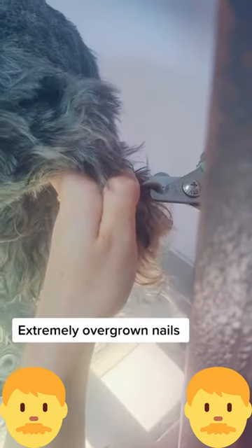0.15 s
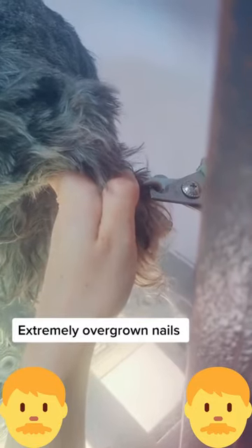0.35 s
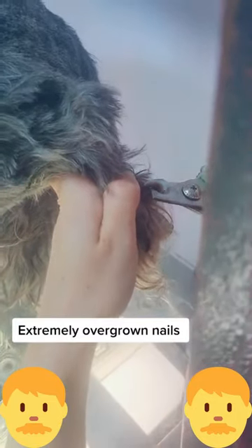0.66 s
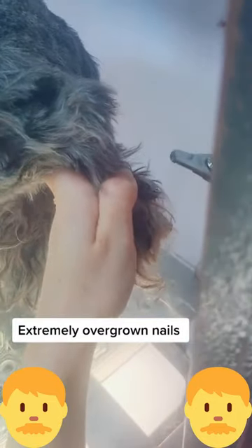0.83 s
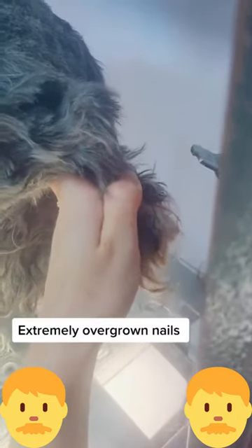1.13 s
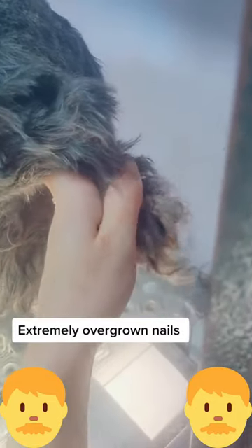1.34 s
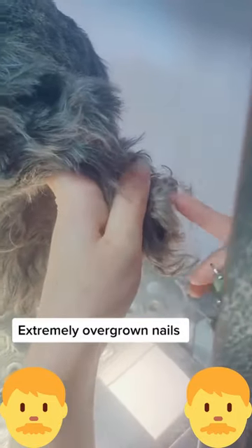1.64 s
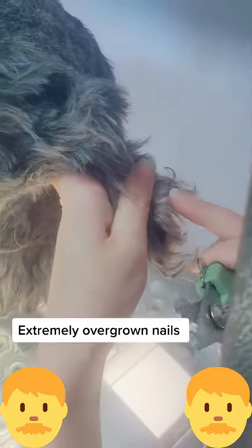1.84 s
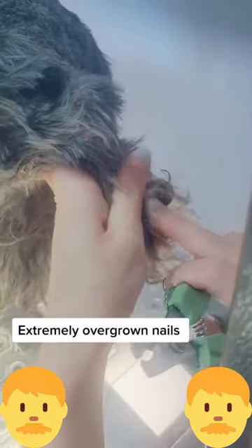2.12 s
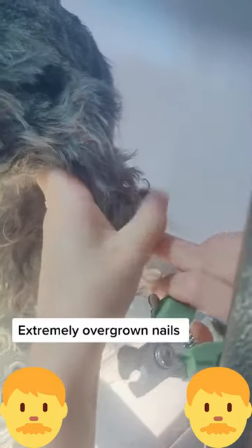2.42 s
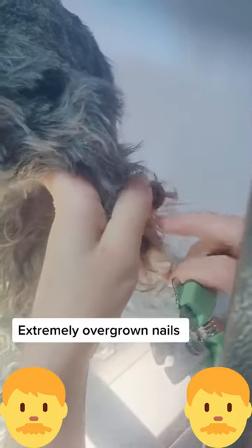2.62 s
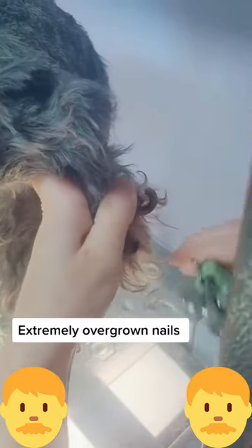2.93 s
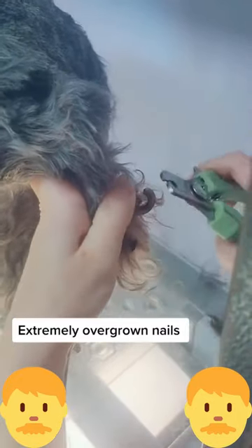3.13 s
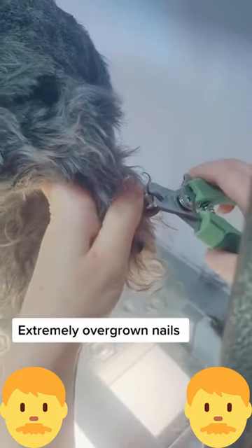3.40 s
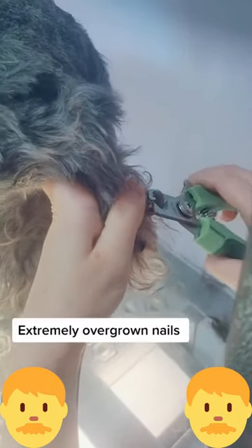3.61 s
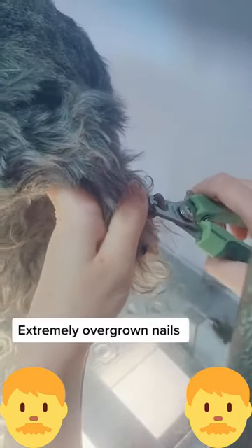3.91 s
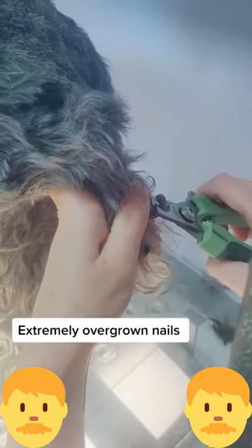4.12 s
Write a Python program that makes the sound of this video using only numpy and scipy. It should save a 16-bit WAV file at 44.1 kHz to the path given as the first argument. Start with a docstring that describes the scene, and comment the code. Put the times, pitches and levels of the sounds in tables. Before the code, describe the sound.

Low, steady air rumble with faint fan tones fills a small reverberant room. Before one second a dog's nail cracks sharply between metal clipper jaws. The tool then clicks and rattles lightly in the hand, strongest about a second later, while fingers brush fur. Muffled bumps come as the dog shifts; the rustle then settles into near quiet.

```python
"""Nail clippers at a dog's paw, close to the microphone in a small hard-walled room.
Faint strokes of friction hiss lead to the snap: a run of noise cracks, with decaying sines as the ringing jaws.
Then the tool clicks and scrapes in the hand (coloured noise bursts and hiss), and fingers brush the fur.
Dull bumps of muffled noise are the dog shifting its weight; the rustle of fur holds, then settles.
Ventilation lies under it all: shaped noise, duct resonances and wavering fan tones."""
import sys
import numpy as np
from scipy import signal
from scipy.fft import rfft, irfft, next_fast_len
from scipy.io import wavfile
from scipy.ndimage import uniform_filter1d

SR = 44100
rng = np.random.default_rng(int(sys.argv[2]) if len(sys.argv) > 2 else 0)


def wav_record(signal):
    """Record a signal, one row per channel, as 16-bit PCM in the file named by sys.argv[1]."""
    frames = np.transpose(np.atleast_2d(signal))
    bounded = np.clip(frames, -1, 1)
    # unit amplitude maps onto the largest positive 16-bit level
    quanta = np.round(bounded * 32767).astype(np.int16)
    wavfile.write(sys.argv[1], SR, quanta)


N = 187583

# The nail gives way in a quick run of cracks: (time [s], level [dB])
NAIL_CRACKS = [(0.8115, -36.5), (0.815, -28.5), (0.8162, -17), (0.8177, -13.5), (0.8186, -20.5),
               (0.8192, -18.5), (0.822, -26)]
# Spectrum of each crack: (frequency [Hz], relative level [dB])
CRACK_COLOUR = [(200, -46), (550, -38), (730, -10.5), (1000, -15.5), (1500, -9), (2200, -10.5), (3000, -5),
                (4400, -1), (6200, -7.5), (8000, 4), (10000, -9.5), (12500, -9), (14000, -9), (16000, -8.5)]
# Ringing of the released jaws: (frequency [Hz], relative level [dB], t60 [s])
JAW_MODES = [(790, -12, 0.024), (1989, -9.5, .03), (2640, -9.5, 0.056), (4160, -4.5, 0.028),
             (4860, -1.5, 0.034), (5970, -8.5, 0.046), (6620, -7, .04), (7400, -5, 0.047),
             (8320, 1.5, 0.025), (8950, -1, .025), (9570, -10.5, .035), (10030, -8.5, .03),
             (10500, -11, 0.017), (14200, -10, .02), (14800, -11.5, .025), (15300, -7, .02)]
# Spectrum of the snap as the walls return it: (frequency [Hz], relative level [dB])
SNAP_ECHO_COLOUR = [(200, -27), (700, -15), (1500, -13), (2000, -6), (2700, -1), (3700, -3), (5000, -3.5),
                    (6500, 0), (8000, -.5), (10000, -5), (11200, -10), (13800, -8), (16000, -14)]


def snap(ring_db=-22, crack_t60_s=0.0069, ring_rise_s=0.0014, echo_db=-33.5, ring_room_db=-19):
    """The nail cracks through, the released jaws ring in decaying modes, and the room answers."""
    cracks, jaws = np.zeros(N), np.zeros(N)
    for start_s, level_db in NAIL_CRACKS:
        add(cracks, start_s, amp(level_db) * burst(crack_t60_s, CRACK_COLOUR))

    release_s = NAIL_CRACKS[1][0]  # the second crack frees the jaws
    t = np.arange(SR // 4) / SR
    ring = np.zeros(len(t))
    for hz, level_db, t60_s in JAW_MODES:
        sine = np.sin(2 * np.pi * (hz * t + rng.random()))
        ring += amp(level_db) * decay(t, t60_s) * sine
    onset = 1 - np.exp(-t / ring_rise_s)
    add(jaws, release_s, amp(ring_db) * ring * onset)

    out = direct(cracks + jaws) + amp(ring_room_db) * room(jaws)
    add(out, release_s, amp(echo_db) * echo(SNAP_ECHO_COLOUR))
    return out


# Clicks of the jaws, spring and handles: (time [s], level [dB], t60 [s], thud [dB], body [dB], top [dB],
# echo level [dB], left minus right [dB])
TOOL_CLICKS = [(1.0898, -48.5, 0.035, -12, -9.5, 0, -70.5, 1),
               (1.5316, -34.5, 0.053, 4, -4, -8, -39.5, -5.5),
               (1.5390, -45, 0.067, 18.5, 12, -10, -41.5, -1), (1.783, -51, 0.036, -23, -6.5, 13, -67, -13),
               (1.8134, -30.5, 0.0081, -12, 3, -15, -51, -2), (1.8176, -41, 0.089, -4, 16.5, 4.5, -43.5, 3),
               (2.128, -54, 0.033, -11, -24, 5, -54.5, 3), (2.2552, -52.5, 0.051, 7, 0, -2.5, -55, -1),
               (3.0522, -58.5, .018, -10, 3, -8, -72.5, 3)]
# Spectrum shared by all clicks: (frequency [Hz], relative level [dB])
TOOL_COLOUR = [(100, -12), (220, -9), (370, -4), (560, -13.5), (800, -8), (1500, -13), (2400, -5),
               (3800, -1.5), (4800, -1.5), (6500, 0.5), (8000, 0), (10500, -6.5), (12500, -4.5),
               (15500, -6.5)]


def clicks(thud_hz=450, body_hz=3350, mid_hz=5600, top_hz=13500):
    """Each knock stresses other parts of the tool, and so has its own colour."""
    out = np.zeros((2, N))
    for start_s, level_db, t60_s, thud_db, body_db, top_db, echo_db, pan_db in TOOL_CLICKS:
        stress = [(thud_hz, thud_db), (body_hz, body_db), (mid_hz, 0), (top_hz, top_db)]
        sides = amp([[level_db + pan_db / 2], [level_db - pan_db / 2]])
        add(out, start_s, sides * direct(burst(t60_s, TOOL_COLOUR, stress)))
        add(out, start_s, amp(echo_db) * echo(TOOL_COLOUR, stress))
    return out


# Strokes of blade on nail, metal on metal and fingers on fur:
# (time [s], length [s], level [dB], top [dB], level change from start to end [dB])
STROKES = [(0.54, 0.051, -78, -4, 4), (0.627, 0.023, -75, -7, 0), (0.697, 0.035, -76, -7, -2),
           (1.065, 0.06, -62, 1, -2.5), (1.51, 0.042, -60.5, -20, 9.5), (1.777, 0.043, -50.5, 7.5, 12),
           (2.105, 0.093, -60.5, 8, -6.5), (2.302, 0.1, -70.5, -12, 3), (2.36, 0.43, -77, -15, -17),
           (2.90, 0.17, -79.5, -1.5, 4), (2.998, 0.03, -70.5, 0.5, -1.5)]
# Spectrum of the friction hiss: (frequency [Hz], relative level [dB])
RUB_COLOUR = [(300, -23.5), (2000, -10.5), (4000, -3), (5500, -3.5), (7500, 1), (11000, -9), (13000, -0.5),
              (16000, -9)]


def rubs(grain_db=1.5, slip_hz=450, mid_hz=7500, top_hz=13500, taper=0.36):
    """Friction hiss, made grainy by tiny slips."""
    out = np.zeros(N)
    for start_s, length_s, level_db, top_db, change_db in STROKES:
        grain = amp(grain_db * drift(SR, slip_hz))
        hiss = noise(SR, RUB_COLOUR, [(mid_hz, 0), (top_hz, top_db)]) * grain
        count = round(length_s * SR)
        stroke = evened(hiss[:count] * amp(np.linspace(0, change_db, count)))
        add(out, start_s, amp(level_db) * stroke * signal.windows.tukey(count, taper))
    return out


# The dog shifts its weight with soft, dull bumps: (time [s], length [s], level [dB])
WEIGHT_SHIFTS = [(1.121, 0.12, -61.5), (1.283, 0.08, -58), (2.398, 0.45, -57), (2.781, 0.28, -60.5),
                 (3.66, 0.088, -54.5), (3.768, 0.23, -57.5)]
# Muffling of a shift against the rustle: (frequency [Hz], gain [dB])
SHIFT_DULLING = [(350, 1), (700, -13)]


def shifts():
    """Each shift of the dog is one smooth swell of muffled rustle."""
    out = np.zeros((2, N))
    for start_s, length_s, level_db in WEIGHT_SHIFTS:
        count = round(length_s * SR)
        rustle = evened(diffuse(SR, SHUFFLE_COLOUR, SHIFT_DULLING)[:, :count])
        add(out, start_s, amp(level_db) * np.hanning(count) * rustle)
    return out


# Spectrum of fur and sleeves, also under the shifts: (frequency [Hz], relative level [dB])
SHUFFLE_COLOUR = [(80, -13), (170, -6), (290, 1), (450, -13), (1000, -4.5), (1600, -12), (2400, -14),
                  (4000, -31.5), (9000, -48)]
# The fur rustles while the paw is handled, then settles once it is held still
RUSTLE_DB, SETTLE_AT_S, SETTLE_DB_PER_S, SETTLED_DB = -62.5, 2.4, 16, -68.5


def shuffle(uneven_db=1.1, uneven_hz=10, patchy_db=2.5):
    """Soft, uneven rustle of fur and sleeves: it holds, then dies down to a faint rest."""
    settling_s = np.maximum(np.arange(N) / SR - SETTLE_AT_S, 0)
    level_db = np.maximum(RUSTLE_DB - SETTLE_DB_PER_S * settling_s, SETTLED_DB)
    rustle = mottle(diffuse(N, SHUFFLE_COLOUR), patchy_db)
    return amp(level_db + uneven_db * drift(N, uneven_hz)) * rustle


# Spectrum of the air noise: (frequency [Hz], relative level per Hz [dB])
AIR_COLOUR = [(15, -3.5), (28, 0.5), (38, -4), (66, -3), (100, -7.5), (160, -16), (250, -16), (400, -25.5),
              (950, -26.5), (2200, -38.5), (4700, -49.5), (6800, -47.5), (9000, -58), (10200, -71),
              (13500, -62)]
# Duct resonances driven by the air: (frequency [Hz], width [Hz], level [dB])
DUCT_MODES = [(67.5, 18, -56), (218.2, 9.1, -69), (266.3, 24, -70), (28, 12, -60)]
# Centres of the swells of the first duct resonance: (time [s])
SURGE_TIMES = [.7, 3.75]
# Fan tones: (frequency [Hz], level before the hum trim [dB])
FAN_TONES = [(522.2, -69), (635.2, -70), (807.5, -78.5), (925.9, -71.5)]
# Stereo lean of the ventilation: (frequency [Hz], left minus right [dB])
AIR_LEAN = [(60, -3), (110, 2.5), (200, -3.5), (380, -1), (700, 0), (1290, -5.5), (2380, -2.5), (4400, 0),
            (8120, -0.5), (15000, 0.5)]
SURGE_DB, SURGE_WIDTH_S, LULL_DB = 6.5, .25, -1.03  # swell height, its half width, trim between swells


def ventilation(air_db=-50, patchy_db=2.5, hum_trim_db=-2, waver=0.48, waver_hz=9, fade_s=.004):
    """Air noise, the duct resonances that it excites, and the wavering tones of the fan."""
    out = amp(air_db) * mottle(diffuse(N, AIR_COLOUR), patchy_db)
    t = np.arange(N) / SR
    surge = sum(np.exp(-((t - centre_s) / SURGE_WIDTH_S) ** 2) for centre_s in SURGE_TIMES)
    for k, (hz, width_hz, level_db) in enumerate(DUCT_MODES):
        surge_db = LULL_DB + SURGE_DB * surge if k == 0 else 0
        out += amp(level_db + surge_db) * tone(hz, wander(width_hz / 2))
    for hz, level_db in FAN_TONES:
        swing = np.sqrt(2) + waver * wander(waver_hz)
        out += amp(level_db + hum_trim_db) * tone(hz, swing)
    fade = signal.windows.tukey(N, 2 * fade_s * SR / N)  # in and out
    return lean(out * fade, AIR_LEAN)


# Stereo lean of the near sound: (frequency [Hz], left minus right [dB])
NEAR_BALANCE = [(100, 5), (380, -2), (1300, -1), (4400, 0), (8100, -4.5), (11000, -4.5), (15000, 5.5)]
# Echoes off the hand, the paw and the nearest wall: (delay [s], left gain [factor], right gain [factor])
EARLY_ECHOES = [(.0007, 0.098, -.14), (.0031, -0.059, 0.12), (.0094, .12, .05)]


def direct(x):
    """The near sound leans left or right by band, and surfaces close by return early echoes."""
    out = lean(x, NEAR_BALANCE)
    for delay_s, left, right in EARLY_ECHOES:
        add(out[0], delay_s, left * x)
        add(out[1], delay_s, right * x)
    return out


# Spectrum of the room's answer: (frequency [Hz], relative level [dB])
ROOM_COLOUR = [(200, 7), (3000, 3), (7500, -2), (16000, -8)]


def room(x):
    """Any sound as it comes back from the walls, convolved with a dense tail."""
    tail = echo(ROOM_COLOUR)
    tail = tail / np.linalg.norm(tail[0])
    return signal.fftconvolve(x[None], tail, axes=1)[:, :N]


# Reverberation time of the room: (frequency [Hz], t60 [s])
ROOM_T60 = [(200, .25), (800, 0.31), (1900, 0.56), (3000, 0.41), (6500, 0.47), (9000, 0.42), (12000, 0.37),
            (16000, 0.25)]


def echo(*colours, delay_s=.002, build_s=.004, patchy_db=3.0):
    """The dense tail that hard walls make of a blow; each band dies at its own rate."""
    hz, t, bands = signal.stft(mottle(diffuse(SR, *colours), patchy_db), SR, nperseg=256)
    tail = signal.istft(bands * decay(t, read(ROOM_T60, hz)[:, None]), SR)[1]
    since_s = np.maximum(np.arange(tail.shape[1]) / SR - delay_s, 0)
    return tail * (1 - np.exp(-since_s / build_s))


# Left-right correlation of the diffuse sound, set by band: wide in the middle, nearly mono above 7 kHz:
# (frequency [Hz], correlation [-1 to 1])
STEREO_LIKENESS = [(60, 0.98), (140, 1), (320, .7), (680, -0.06), (1400, -0.22), (2800, 0.37),
                   (4500, 0.088), (6100, .25), (6900, .94), (14000, 1)]


def diffuse(count, *colours):
    """Stereo noise whose left-right likeness follows a table, band by band."""
    a, b = rfft(noise(count, *colours)), rfft(noise(count, *colours))
    same = np.clip(read(STEREO_LIKENESS, np.fft.rfftfreq(count, 1 / SR)), -1, 1)
    return irfft(np.array([a, same * a + np.sqrt(1 - same ** 2) * b]), count)


def tone(hz, swing):
    """A tone with complex amplitude swing; a phase shift on the right sets its left-right likeness."""
    shift = np.arccos(np.clip(read(STEREO_LIKENESS, hz), -1, 1)) * np.array([[0], [1]])
    return (swing * np.exp(1j * (2 * np.pi * hz * np.arange(N) / SR + shift))).real


def mottle(x, patchy_db, size=512):
    """Random gains lift and sink small patches of time and frequency, alike on both sides."""
    bands = signal.stft(x, nperseg=size)[2]
    field = rng.standard_normal(bands.shape[1:])
    field = uniform_filter1d(field, size=3, axis=0)  # smooth over frequency
    field = uniform_filter1d(field, size=10, axis=1)  # smooth over time
    gain = evened(amp(patchy_db * evened(field)))
    return signal.istft(bands * gain)[1][:, :x.shape[1]]


def lean(x, balance):
    """Tips a sound to the left or right, band by band."""
    count = x.shape[-1]
    size = next_fast_len(2 * count)
    half_db = read(balance, np.fft.rfftfreq(size, 1 / SR)) / 2
    return irfft(rfft(x, size) * amp([half_db, -half_db]), size)[:, :count]


def burst(t60_s, *colours, size=8192, rise_s=.0002):
    """A blow into many close, quickly dying modes, made as decaying noise."""
    t = np.arange(size) / SR
    return noise(size, *colours) * decay(t, t60_s) * (1 - np.exp(-t / rise_s))


def decay(t, t60_s):
    """Exponential fall of 60 dB in t60_s seconds."""
    return np.exp(-np.log(1000) * t / t60_s)


def noise(count, *colours):
    """Noise of rms 1 whose spectrum is the sum of some dB tables."""
    hz = np.fft.rfftfreq(count, 1 / SR)
    phase = np.exp(2j * np.pi * rng.random(len(hz)))
    level_db = sum(read(colour, hz) for colour in colours)
    return evened(irfft(phase * amp(level_db), count))


def drift(count, hz):
    """Random wavering of rms 1, up to about hz."""
    size = next_fast_len(count)
    f = np.fft.rfftfreq(size, 1 / SR)
    spectrum = rfft(rng.standard_normal(size)) * np.exp(-(f / hz) ** 2)
    return evened(irfft(spectrum, size)[:count])


def wander(hz):
    """Complex wavering of a tone's strength and phase."""
    return drift(N, hz) + 1j * drift(N, hz)


def amp(db):
    """Decibels to gain."""
    return 10 ** (np.asarray(db) / 20)


def evened(x):
    """Scaled to rms 1."""
    return x / np.sqrt(np.mean(x ** 2) + 1e-20)


def read(points, hz):
    """A table of (frequency [Hz], value) joined by straight lines over log frequency."""
    f, value = np.transpose(points)
    return np.interp(np.log(hz + 1), np.log(f + 1), value)


def add(mix, start_s, sound):
    """Mixes a sound in at start_s, cut off at the end of the mix."""
    part = mix[..., round(start_s * SR):][..., :sound.shape[-1]]
    part += sound[..., :part.shape[-1]]


def scene(rub_room_db=-2):
    """Snap, clicks and rubs, near and off the walls, over the dog's stirring and the ventilation."""
    rub = rubs()
    tool = snap() + clicks() + direct(rub) + amp(rub_room_db) * room(rub)
    return tool + shifts() + shuffle() + ventilation()


def record(dry, edge_hz=15900):
    """The recorder's band limit, a steep lowpass."""
    lowpass = signal.firwin(511, edge_hz, window=("kaiser", 9), fs=SR)
    return signal.oaconvolve(dry, lowpass[None], "same")


dry = scene()
out = record(dry)
wav_record(out)
```